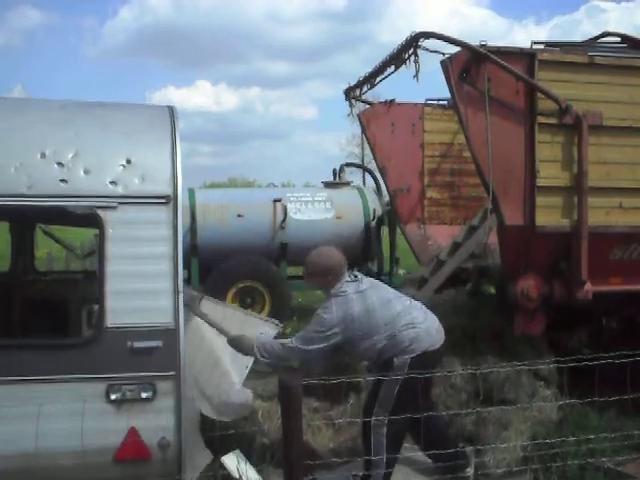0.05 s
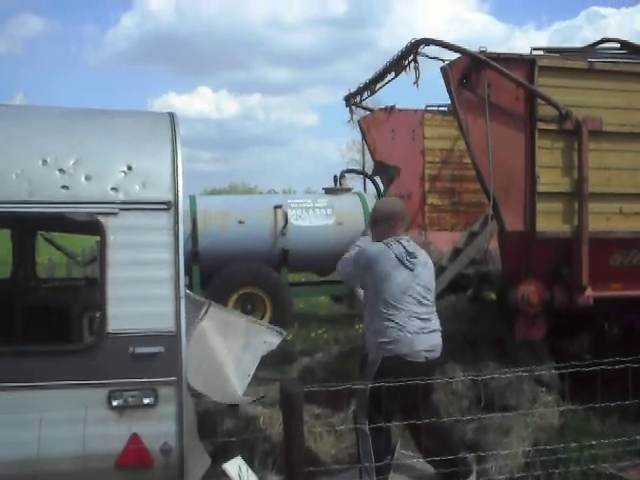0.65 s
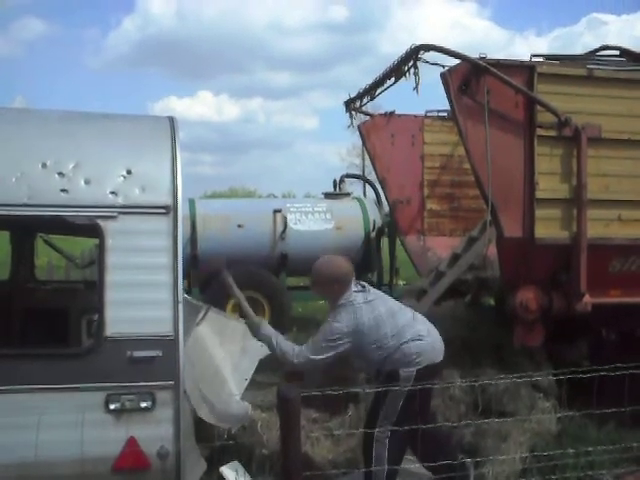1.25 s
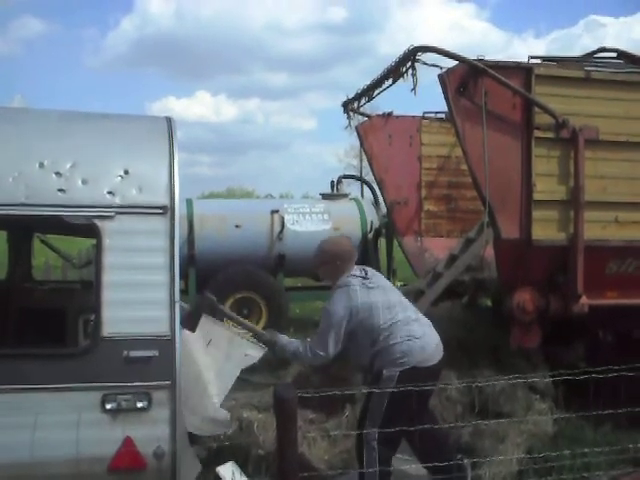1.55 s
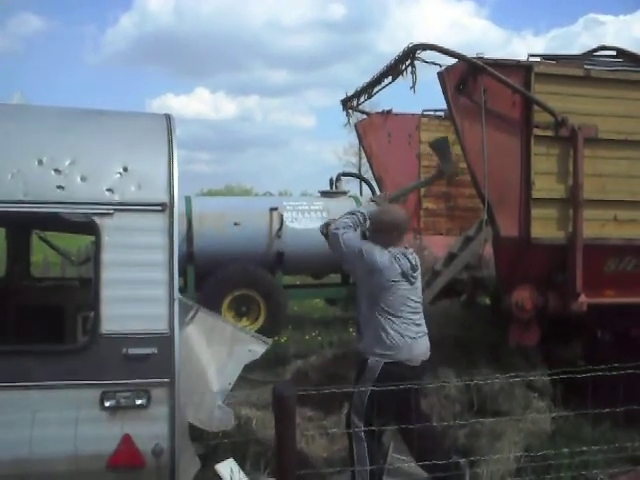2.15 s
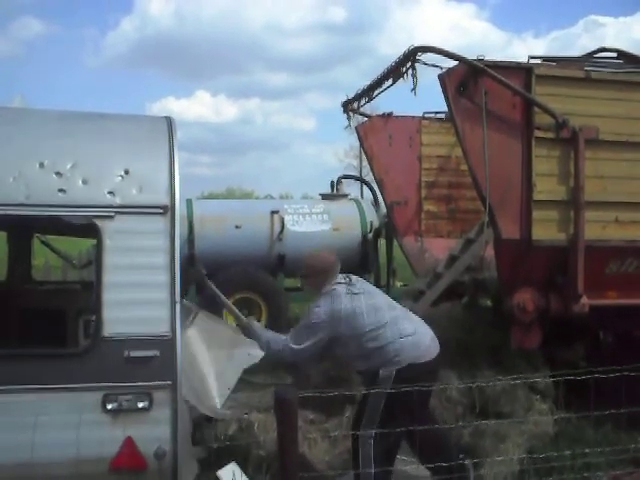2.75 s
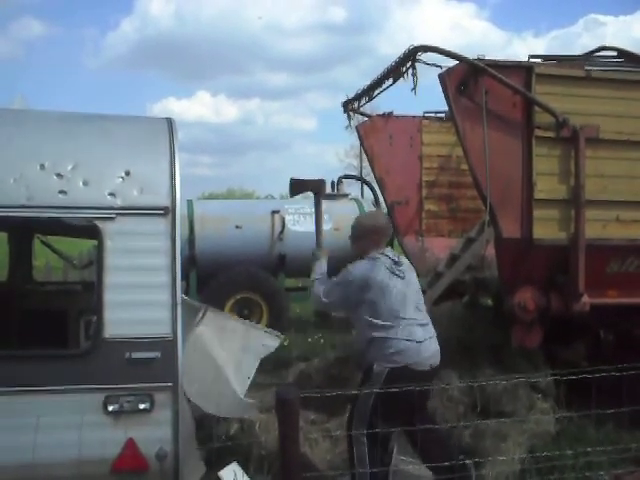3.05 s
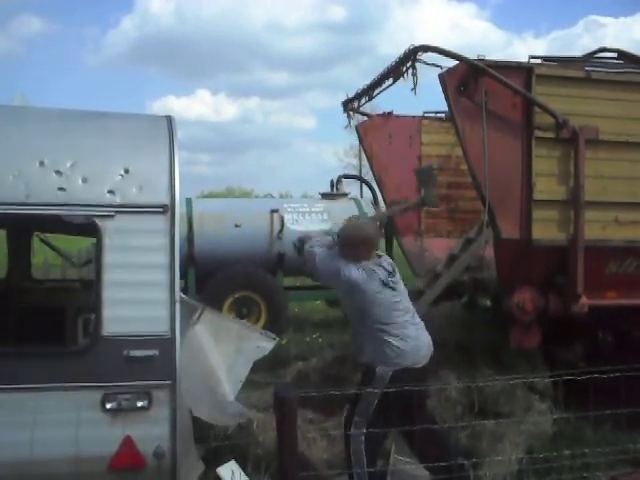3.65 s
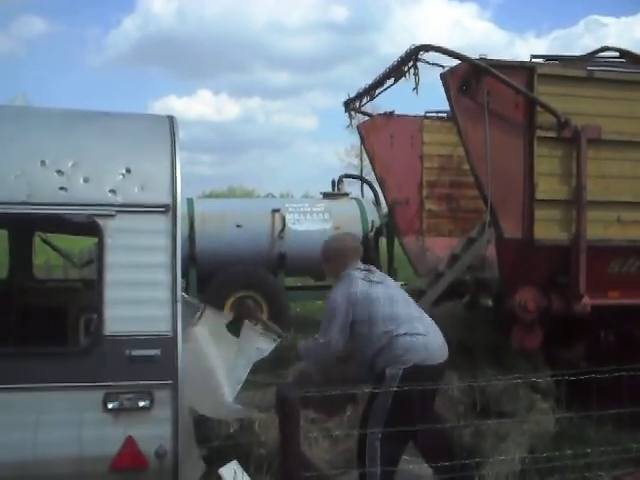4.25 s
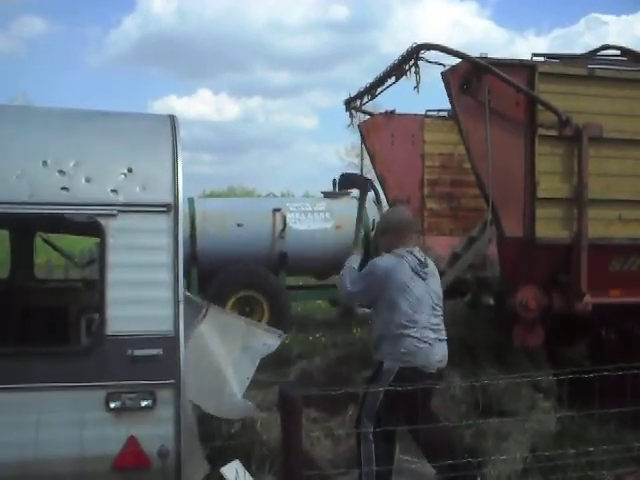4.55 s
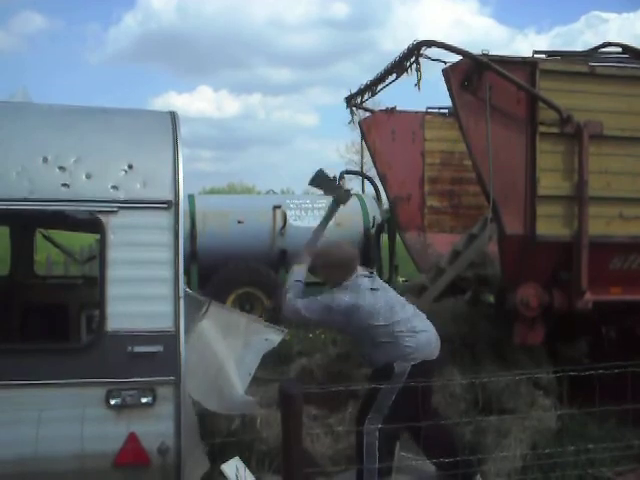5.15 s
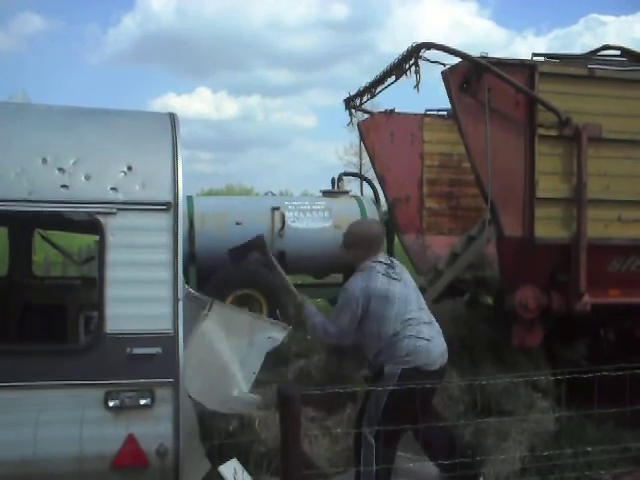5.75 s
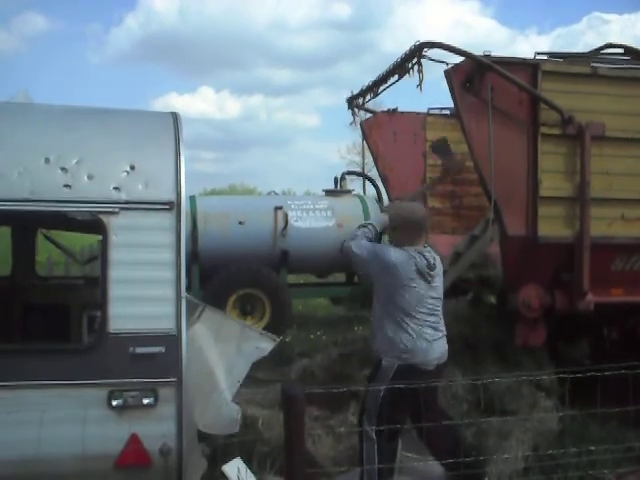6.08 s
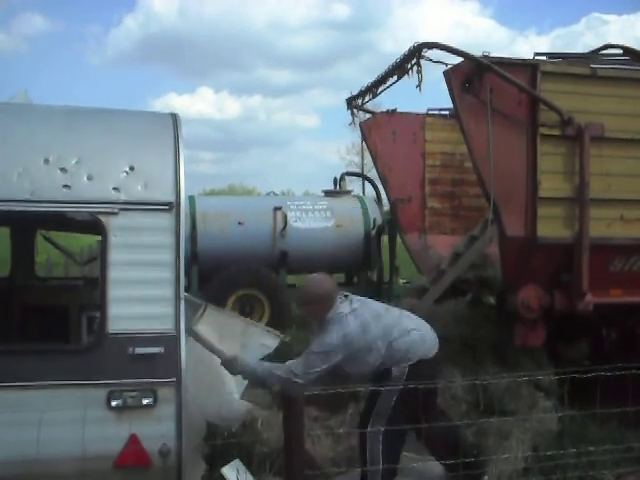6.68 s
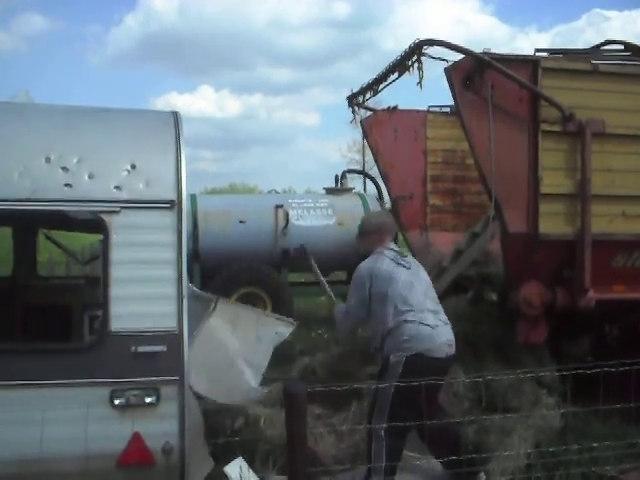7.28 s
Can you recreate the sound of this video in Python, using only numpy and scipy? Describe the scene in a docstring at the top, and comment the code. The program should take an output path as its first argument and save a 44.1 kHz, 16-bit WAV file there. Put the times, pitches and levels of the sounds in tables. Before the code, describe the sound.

Over faint farmyard rumble, hiss and a barely audible high whine, six heavy axe blows land on a caravan wall, a little over a second apart. The metal crumples, the hollow body booms and its fittings rattle, with a quick echo from the yard. Dry knocks and quiet footsteps fall in the gaps, and loose pieces clatter around the last blow. The small microphone distorts on the hits.

```python
"""An axe hacks six times into the sheet-metal side of an old caravan in a farmyard.
Each blow shoves the wall, crumples the skin and leaves the hollow body booming and its fittings
rattling; the yard echoes it and chips patter down. Between swings come dull knocks, soft steps and
loose pieces clattering, over a low rumble, hiss and a faint whine.
The bangs overload a small camera microphone."""
import sys
import numpy as np
from scipy import signal
from scipy.fft import rfft, irfft
from scipy.io import wavfile

SR = 44100
rng = np.random.default_rng(int(sys.argv[2]) if len(sys.argv) > 2 else 0)


def to_wav(sig):
    """Store sig (one row per channel, or 1-D mono) as 16-bit WAV at the path in sys.argv[1].

    Samples outside -1..1 are clipped; the rate is SR.
    """
    pcm = np.clip(np.atleast_2d(sig), -1, 1) * 32767
    pcm = np.round(pcm).astype(np.int16)
    wavfile.write(sys.argv[1], SR, pcm.T)  # frames by channels


N = 331632
T = np.arange(SR) / SR  # one second of time since a hit


def undb(db):
    """Decibels to gain."""
    return 10 ** (np.asarray(db) / 20)


def unit(x):
    """Scale to an rms of one."""
    return x / np.sqrt(np.mean(x ** 2))


def add(out, s, x):
    """Mix x into out from second s on."""
    i = int(s * SR)
    out[i:i + len(x)] += x[:len(out) - i]


def through(x, response):
    """Pass x through an impulse response."""
    return signal.fftconvolve(x, response)[:len(x)]


def colour(x, points, tilt_db=0, size=4096):
    """Minimum-phase EQ of unit power through the given points, tilted by dB per octave."""
    hz, db = np.transpose(points)
    octave = np.log2(np.maximum(np.arange(size // 2 + 1), .5) * SR / size)
    gain = unit(undb(np.interp(octave, np.log2(hz), db) + tilt_db * octave))
    cepstrum = irfft(np.log(gain))
    cepstrum[1:size // 2] *= 2
    cepstrum[size // 2 + 1:] = 0
    return through(x, irfft(np.exp(rfft(cepstrum))))


def snaps(rate):
    """One second of crackle: random clicks of uneven size, rms one."""
    return unit(rng.standard_normal(SR) * (rng.random(SR) < rate / SR) + 1e-9)


def swell(start, rise, fall):
    """Envelope with an exponential attack and decay; times in seconds."""
    t = np.maximum(T - start, 0)
    return (1 - np.exp(-t / rise)) * np.exp(-t / fall)


def burst(start, rise, length):
    """Envelope with a fast attack, a brief hold and a steep release; times in seconds."""
    t = np.maximum(T - start, 0)
    return (1 - np.exp(-t / rise)) * np.exp(-(t / length) ** 1.46)


def half_sine(length_s):
    """One smooth arch, then silence."""
    return np.sin(np.pi * np.minimum(T / length_s, 1))


# bass-heavy EQ of the outdoor bed: f/Hz, level/dB
AIR_EQ = [(20, -2.5), (40, -5), (60, -14.5), (100, -9), (150, -20), (300, -22), (600, -29.5), (1100, -30),
          (3000, -36), (7000, -38.5), (10500, -40.5)]


def air():
    """Steady hiss over a low outdoor rumble that wanders in level."""
    bed = unit(colour(rng.standard_normal(N), AIR_EQ))
    rumble = signal.sosfilt(signal.butter(2, 250, fs=SR, output="sos"), bed)
    drift_db = 1.6 * np.interp(np.linspace(0, 1, N), np.linspace(0, 1, 40), rng.standard_normal(40))
    return undb(-52) * (bed + rumble * (undb(drift_db) - 1))


def whine(hz=7138):
    """A thin, steady tone tucked into the hiss."""
    return undb(-82) * unit(np.sin(2 * np.pi * hz * np.arange(N) / SR))


# axe hit cues: t/s, bang level/dB, second bite delay/s, second bite level/dB, chip level/dB
AXE_CUES = [(0.0914, -3.5, 0.032, -1, -59), (1.3512, -3, .029, 1, -50.5), (2.609, -1.5, 0.033, -11.5, -53),
            (3.9386, 0, 0.041, -5.5, -53.5), (5.3198, -0.5, .022, -13, -56), (6.7249, 0, 0.052, -13.5, -44)]


def axe_blows(out, low_trim_db=.76):
    """Layer bang, boom, rattle and chips; a harder blow is brighter and shakes the fittings more."""
    for s, db, bite_s, bite_db, chips_db in AXE_CUES:
        tilt_db = .5 * (-.87 + .4 * db)
        hit = undb(db) * bang(bite_s, bite_db, tilt_db, low_trim_db)
        boom = undb(low_trim_db) * cabin_boom()
        rattle = undb(2.3 + .9 * db) * fittings_rattle()
        add(out, s, hit + boom + rattle + undb(chips_db) * falling_chips())


# low-mid punch of the panel: f/Hz, level/dB
SLAM_EQ = [(40, -12.5), (110, -6.5), (200, 6.5), (330, 1.5), (480, 7), (640, 3), (800, -6), (1100, -7),
           (2000, -20), (4000, -20.5), (10000, -33.5)]
# crunch of the buckling skin: f/Hz, level/dB
SKIN_EQ = [(40, -11), (150, -3), (330, -5), (560, 0), (780, -4), (1050, -1.5), (1500, -5), (2050, -4.5),
           (2400, -8.5), (3400, -8), (5000, -15.5), (7500, -23), (10000, -31)]


def bang(bite_s, bite_db, tilt_db, low_trim_db):
    """The blade shoves the wall, slams the panel, then buckles the skin in two bites of snaps."""
    shove = -half_sine(.002) ** 2  # the wall gives way: a brief dip in pressure
    # the whole wall pumps in and out about three times
    heave = -undb(low_trim_db) * np.cos(2 * np.pi * 44.5 * T) * half_sine(.068)
    # the panel's crowded low modes answer at once and die fast
    slam = colour(rng.standard_normal(SR) * swell(.0013, rise=.00033, fall=.023), SLAM_EQ)
    force = burst(.0043, rise=.0036, length=.043) + undb(bite_db) * swell(bite_s, rise=.0014, fall=.02)
    crunch = colour(snaps(rate=8000) * force, SKIN_EQ, tilt_db)
    clang = through(snaps(rate=3700) * force, wall_ring())  # the buckling keeps the wall ringing
    return undb(-3) * shove + undb(-14) * heave + undb(-4) * slam + undb(-5) * crunch + undb(-13) * clang


# ringing modes of the wall and cabin: f/Hz, level/dB
WALL_MODES = [(47, -9.5), (79, -6), (158, -4.5), (199, -7), (226, -8), (300, -7.5), (425, -4.5), (483, -5),
              (511, -5.5), (560, -8.5), (619, -1), (704, -8), (917, -6.5), (982, -4), (1048, -4),
              (1182, -9.5), (1849, -7), (2017, -6.5), (2140, -8), (2547, -10), (2849, -6.5), (3475, -9),
              (4034, -13.5)]


def wall_ring(detune=.0016, mid_t60_s=.27, damping=.45):
    """The wall's metallic ring: higher modes die sooner, and each new dent pulls their pitch a little."""
    hz, db = np.transpose(WALL_MODES)[:, :, None]
    t60 = mid_t60_s * (hz / np.median(hz)) ** -damping
    hz = hz * (1 + detune * rng.standard_normal(hz.shape))
    decay = np.exp(-np.log(1000) * T / t60)
    ring = np.sum(undb(db) * np.sin(2 * np.pi * hz * T) * decay, axis=0)
    return ring / np.linalg.norm(ring)


# deep body of the hollow cabin: f/Hz, level/dB
CABIN_EQ = [(25, -2), (55, 7), (110, 1), (170, -0.5), (300, -9.5), (540, -11.5), (750, -18.5), (1200, -22),
            (3000, -26.5), (9000, -44.5)]


def cabin_boom():
    """The hollow cabin booms on, swelling again as its low echo returns."""
    boom_and_echo = swell(.0044, rise=.0047, fall=.085) + undb(-9) * swell(.11, rise=.0042, fall=.15)
    return undb(-22.5) * colour(rng.standard_normal(SR) * boom_and_echo, CABIN_EQ)


# boxy midrange of the fittings: f/Hz, level/dB
RATTLE_EQ = [(100, -10.5), (300, -5), (540, 7.5), (750, -1.5), (1300, -9.5), (4000, -13), (10000, -31)]


def fittings_rattle():
    """Loose fittings chatter against the cabin, each contact a short burst of noise."""
    contacts = through(snaps(rate=110) ** 2, np.exp(-T / .02))
    chatter = unit(np.sqrt(np.abs(contacts))) * rng.standard_normal(SR)
    return undb(-23.5) * colour(chatter * swell(.044, rise=.024, fall=.077), RATTLE_EQ)


# tone of the yard's reflections: f/Hz, level/dB
YARD_EQ = [(100, -5.5), (600, -4), (1500, -4), (3000, 0), (6000, 3), (10000, 0)]


def yard_echo(x, delay_s=.13, spread_s=.041):
    """Nearby machines scatter the sound at once; a brighter, smeared slap returns from further off."""
    near_envelope = unit(swell(.011, rise=.011, fall=.036))
    far_envelope = unit(burst(delay_s, rise=.0064, length=spread_s))
    near = colour(rng.standard_normal(SR) * near_envelope, YARD_EQ, tilt_db=-2.5)
    far = colour(rng.standard_normal(SR) * far_envelope, YARD_EQ)
    return through(x, (undb(-28) * near + undb(-25.5) * far) / np.sqrt(SR))


# clacky tone of chips and loose pieces landing: f/Hz, level/dB
DEBRIS_EQ = [(100, -26), (300, -2.5), (600, 2), (1200, -2.5), (2200, -11), (3200, -8.5), (4100, -10),
             (5200, -17), (10000, -28.5)]


def falling_chips():
    """Chips shaken off the wall patter down and thin out."""
    return colour(snaps(rate=900) * swell(.29, rise=.1, fall=.18), DEBRIS_EQ, tilt_db=.5)


# dull tone of a knock: f/Hz, level/dB
KNOCK_EQ = [(50, 0), (170, 6.5), (400, -3), (700, -4.5), (1100, -4.5), (1450, -6.5), (1800, -10.5),
            (2800, -17), (5000, -25), (10000, -39)]
# knock cues: t/s, level/dB, bounce level/dB
KNOCK_CUES = [(0.565, -28.5, -1), (1.9379, -28.5, -1), (4.596, -26.5, -10)]


def knocks(out, bounce_s=.011):
    """Dry double knocks with a short hollow tail as the axe is drawn back."""
    contact = swell(0, rise=.0028, fall=.0087)
    bounce = swell(bounce_s, rise=.00045, fall=.0022)
    tail = undb(-13.5) * swell(0, rise=.0017, fall=.03)
    for s, db, bounce_db in KNOCK_CUES:
        envelope = contact + undb(bounce_db) * bounce + tail
        add(out, s, undb(db + 4.5) * colour(snaps(rate=5100) * envelope, KNOCK_EQ))


# muffled thud of soft ground: f/Hz, level/dB
STEP_EQ = [(40, -7), (130, 6), (260, -3), (600, -7.5), (1000, -26), (4000, -27.5), (10000, -42.5)]
# footstep cues: t/s, level/dB
STEP_CUES = [(.94, -50.5), (2.18, -39), (3.448, -43.5), (4.759, -49)]


def footsteps(out, press_s=.019):
    """A shoe presses down earth and grass as the axe swings up."""
    press = swell(0, rise=press_s, fall=2 * press_s)
    for s, db in STEP_CUES:
        add(out, s, undb(db + 8) * colour(snaps(rate=5700) * press, STEP_EQ))


# clatter cues: t/s, level/dB, tilt/(dB per octave)
CLATTER_CUES = [(5.693, -44, -3.5), (5.8183, -26.5, -1.5), (6.026, -42.5, 5.5), (6.194, -46.5, -1.5),
                (6.27, -43, 3.5), (6.501, -50.5, -0.5), (6.546, -52, 1), (7.099, -48, 3.5)]


def clatters(out):
    """Loose pieces land and chatter to rest; a harder landing chatters for longer."""
    for s, db, tilt_db in CLATTER_CUES:
        decay_s = .038 * 2 ** ((db + 26.5) / 16)  # doubles every 16 dB
        chatter = snaps(rate=5000) * swell(0, rise=.0016, fall=decay_s)
        add(out, s, undb(db) * colour(chatter, DEBRIS_EQ, tilt_db))


def scene():
    """Mono mix: the blows and small sounds feed the yard's echo, over the outdoor bed."""
    out = np.zeros(N)
    axe_blows(out)
    knocks(out)
    footsteps(out)
    clatters(out)
    return (out + yard_echo(out) + air() + whine())[None]


def record(dry):
    """The microphone loses the top octave, the bangs clip flat, and the recorder rolls off the fizz."""
    mic_hz, roll_hz, top_hz, clip_level = 10400, 10900, 11800, .68
    heard = signal.sosfilt(signal.ellip(6, .3, 60, mic_hz, fs=SR, output="sos"), dry)
    clipped = np.clip(heard, -clip_level, clip_level)
    rolled = signal.sosfiltfilt(signal.butter(6, roll_hz, fs=SR, output="sos"), clipped)
    return signal.sosfilt(signal.ellip(8, .1, 70, top_hz, fs=SR, output="sos"), rolled)


dry = scene()
out = record(dry)
to_wav(out)
```